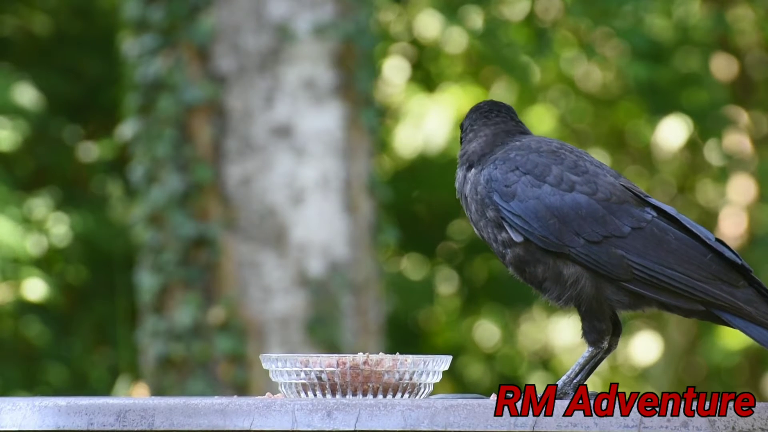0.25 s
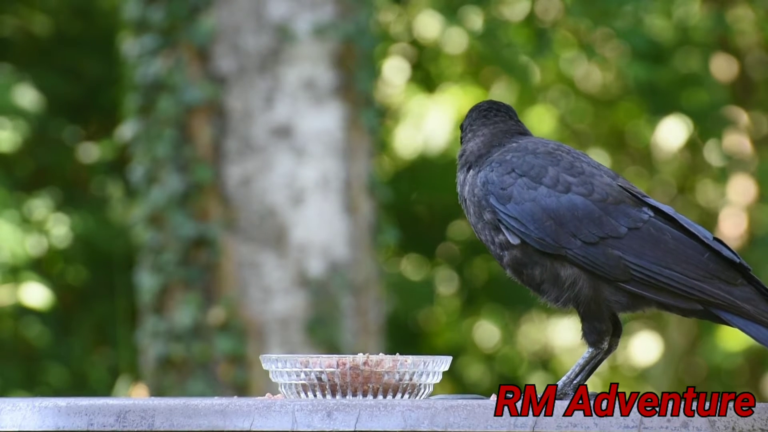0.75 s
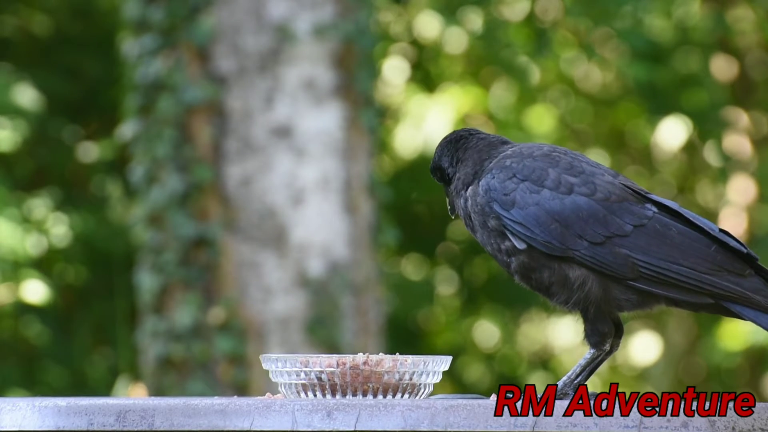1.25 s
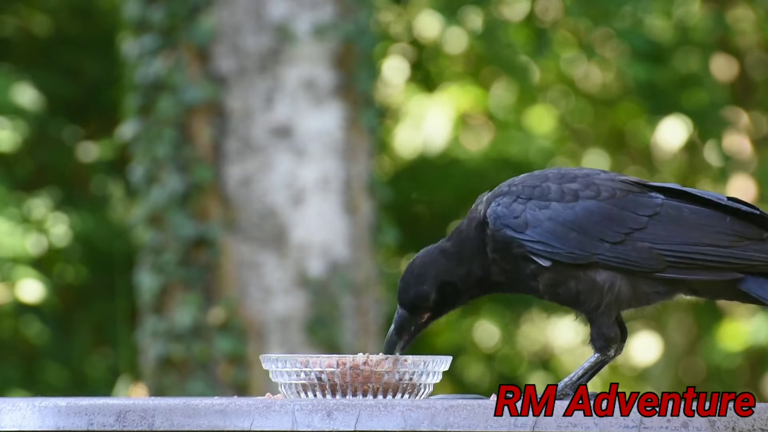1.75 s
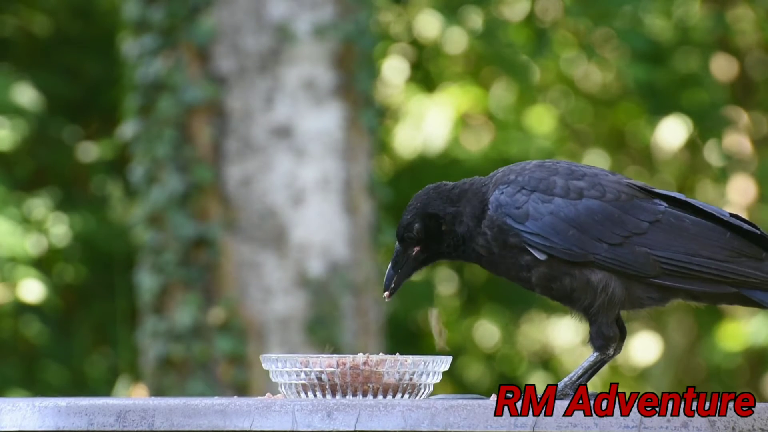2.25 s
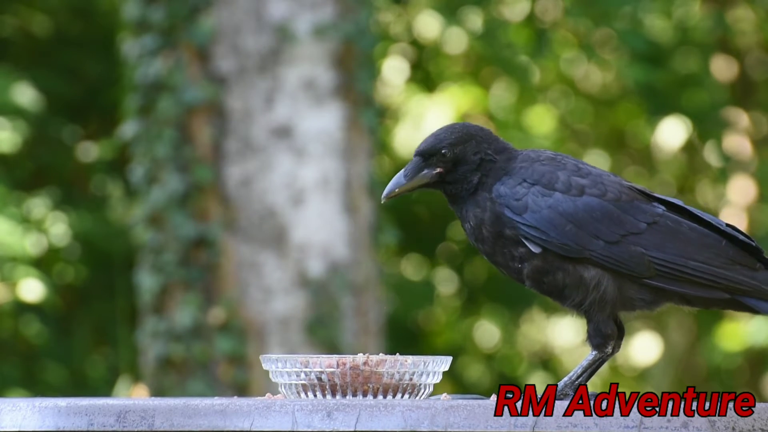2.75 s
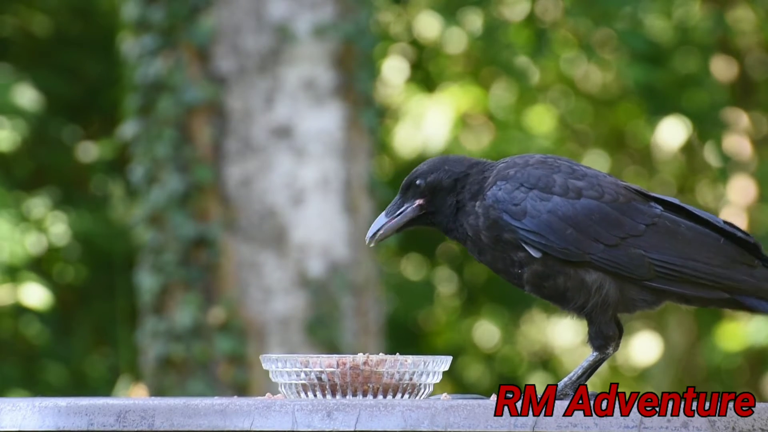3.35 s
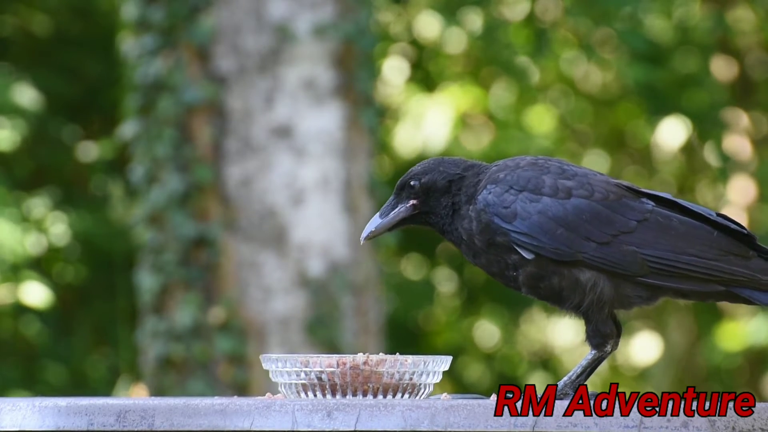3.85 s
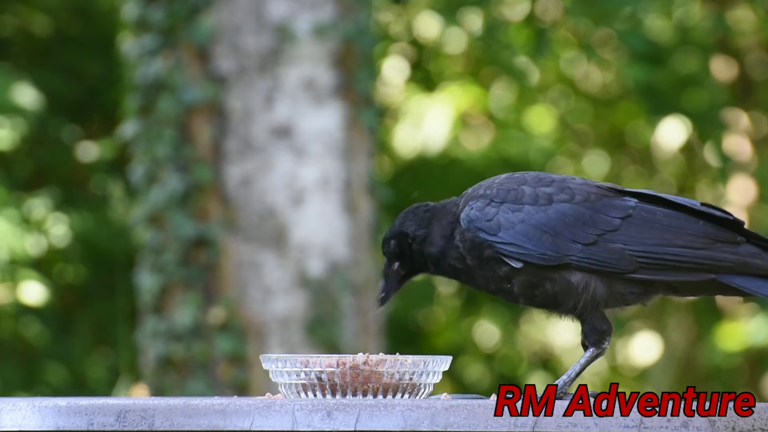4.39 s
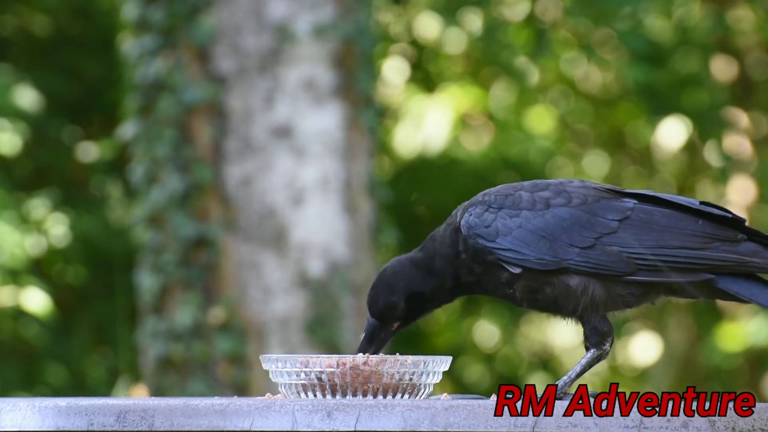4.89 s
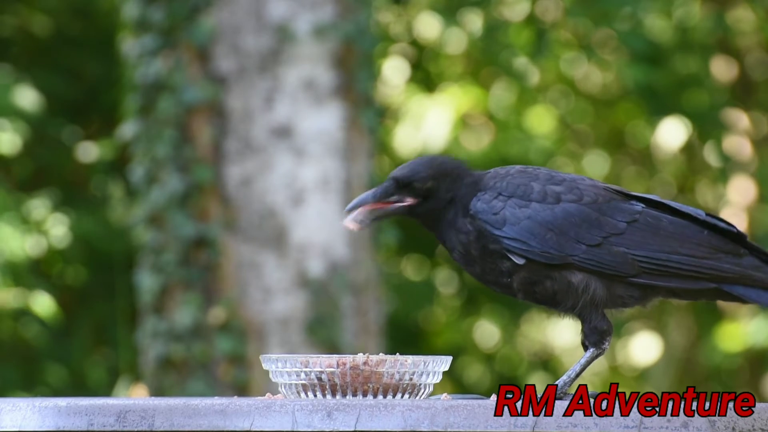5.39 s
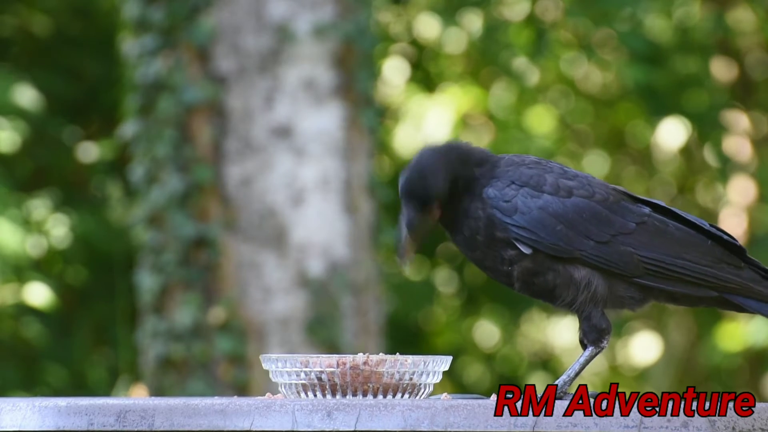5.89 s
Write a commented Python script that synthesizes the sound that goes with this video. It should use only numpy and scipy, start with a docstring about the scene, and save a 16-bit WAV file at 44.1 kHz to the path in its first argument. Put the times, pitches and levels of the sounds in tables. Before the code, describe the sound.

A quiet wooded garden in stereo: soft still air, a faint wavering low hum and a thin, flickering high insect hiss that is strongest around 1 second. At the very start a higher, nasal crow calls faintly from far off, again at about 1.2. Small birds give short, falling chips around 0.5, 0.9 to 1.1 and 1.5 to 1.9, with dry leaf flutters in the first second. A near crow, slightly right, caws at about 1.3, 2.1, 2.7, 3.7 and 4.8, each lasting roughly 0.4 to 0.5 seconds. Each caw swells in, arches slightly in pitch, buzzes and rattles with breathy harsh treble, then drops away into a short scattered echo from the trees. Sparse chips continue between caws, around 2.5, 3.2, 3.8, 4.7 and 5.4. Faint leaf flutters return near 5.2, and dim distant whistles fill the last second until about 6.

```python
"""Crow in the garden trees

A crow caws five times, harsh and rattling: a buzzing voice and puffs of air pass through its throat.
Small birds chip in short sliding whistles. Far crow calls, faint whistles and leaf flutters lie deeper.
The wood throws back a short tail made of scattered echoes.
Under it all lie still air and insects, made of shaped noise, and a faint low hum of wavering tones."""
import sys
import numpy as np
from scipy import signal
from scipy.fft import rfft, irfft, next_fast_len
from scipy.io import wavfile
from scipy.ndimage import uniform_filter1d

SR = 44100
rng = np.random.default_rng(int(sys.argv[2]) if len(sys.argv) > 2 else 0)


def wrap_up_sound(samples):
    """Save the sound to the file named by the first command line argument, as 16-bit audio."""
    columns = np.atleast_2d(samples).T
    # keep every value between -1 and 1, then stretch to whole-number steps
    tamed = np.clip(columns, -1, 1)
    steps = np.round(tamed * 32767).astype(np.int16)
    wavfile.write(sys.argv[1], SR, steps)


N = 270333  # length of the scene in samples

# Levels of single sounds are those before the final mix in scene().
# Still air, shape of its spectrum: (frequency [Hz], relative level [dB per Hz])
AIR_SPECTRUM = [(20, -5), (40, -43), (70, 3), (125, -0.5), (200, -0.5), (300, -5.5), (450, -7), (700, -5.5),
                (1100, -9), (1700, -7), (2600, -10.5), (5000, -8.5), (10000, -19.5), (15000, -18.5)]
# How alike the air is at left and right: (frequency [Hz], likeness [up to 1, below 0 counts as 0])
AIR_LIKENESS = [(60, 0.87), (150, 0.25), (380, 0.45), (940, 0.54), (2350, 0.47), (5890, -0.1),
                (14800, -0.64)]
AIR_DB = -65  # before narrow bands come and go
# Tones of the low hum: (frequency [Hz], width of the pitch waver [Hz], level before its swells [dB])
HUM_TONES = [(52.3, 2.5, -73), (102, 12.5, -78.5), (119.4, 4.8, -79), (174.3, 15.5, -75.5),
             (226, 13.1, -82.5)]
# Swell of all hum tones but the lowest: (time [s], change of level [dB])
HUM_SWELL = [(0, -4.5), (.7, 5), (1.1, 1), (6.1, -2)]
# Insects, shape of their spectrum: (frequency [Hz], relative level [dB])
INSECT_SPECTRUM = [(6500, -9), (7400, -3), (8000, 5), (8800, 4.5), (9400, 1), (10200, -6), (12000, -26.5)]
# Insects, slow loudness before a fast flicker: (time [s], level [dB])
INSECT_LEVELS = [(0, -70), (.5, -66), (1.1, -63), (1.9, -66.5), (2.6, -66), (3.5, -73), (4.5, -69),
                 (6.1, -73)]

# Tail of the wood, time to die by 60 dB: (frequency [Hz], time [s])
WOOD_T60 = [(500, .6), (1800, .55), (3200, .28), (5000, .45), (10000, .4)]
# Quick reflections off the leaves: (frequency [Hz], level [dB])
LEAF_REFLECTIONS = [(1400, -17), (2200, -12), (5000, -5), (10000, -4)]
# Quick reflections, time to die by 60 dB: (frequency [Hz], time [s])
LEAF_T60 = [(1000, 0.36), (8000, 0.091)]

# Dry flutters in the leaves: (start [s], length [s], level [dB])
FLUTTERS = [(0.075, 0.026, -65), (0.476, 0.099, -63.5), (0.778, 0.092, -60.5), (0.931, 0.078, -58.5),
            (4.699, 0.061, -68), (5.182, 0.046, -60.5), (5.306, 0.071, -65.5)]
# Leaf noise, shape of its spectrum: (frequency [Hz], relative level [dB])
LEAF_SPECTRUM = [(1000, -16), (2500, 9), (3500, 16), (6000, 8.5), (8000, 7.5), (14000, -17)]
# Faint whistles deep in the wood: (start [s], pitch [Hz], slide [share of the pitch], level [dB])
FAR_WHISTLES = [(3.27, 4500, 0.03, -109), (3.575, 4544, 0.05, -79), (4.58, 1783, 0.22, -70.5),
                (4.765, 4550, 0.01, -74), (5.14, 720, -0.29, -75), (5.445, 632, -0.27, -74),
                (5.58, 684, 0.16, -68.5), (5.69, 4560, 0.037, -77), (5.77, 1520, 0.09, -74.5),
                (5.995, 4600, 0.11, -74)]
WHISTLE_S = 0.1046
# Far crow: (start [s], length [s], start pitch [Hz], middle pitch [Hz], end pitch [Hz],
#   level before its fades [dB], roughness [about 0-1])
FAR_CAWS = [(0.022, 0.24, 875, 963.5, 847, -51.5, 0.78), (0.25, 0.37, 749, 796, 884, -62.5, 1.03),
            (1.167, 0.188, 967, 991, 934, -49, 0.31)]
# Throat of the far crow: (frequency [Hz], relative level [dB])
FAR_THROAT = [(450, -46), (720, -23), (950, -14.5), (1200, -2.5), (1600, 0.5), (1950, 3), (2400, -16),
              (3000, -27), (4100, -15), (5500, -27.5), (9000, -26)]
# Small birds: (start [s], length [s], start pitch [Hz], slide [share of the pitch], level [dB],
#   octave against the main tone [dB])
CHIPS = [(0.473, 0.039, 3380, -0.092, -50, -13), (0.506, 0.025, 3350, -0.12, -41.5, -12),
         (0.528, 0.037, 3235, -0.11, -40, -18), (0.556, 0.013, 5860, -0.12, -51, -18),
         (0.856, 0.033, 5370, -0.011, -51.5, -18), (0.968, 0.019, 3390, -0.052, -35.5, -32),
         (0.986, 0.028, 3123, -0.01, -42.5, -9.5), (1.052, 0.04, 3310, -0.1, -38, -7.5),
         (1.08, 0.053, 3245, -0.018, -45.5, 1), (1.497, 0.054, 3320, -0.07, -41, -20),
         (1.596, 0.045, 3344, -0.14, -34, 1), (1.886, 0.051, 3180, -0.12, -46, -17),
         (2.451, 0.056, 3080, -0.083, -56, -2), (2.488, 0.047, 4900, 0.053, -52.5, -20),
         (2.53, 0.021, 4590, -0.079, -54.5, -28), (2.585, 0.054, 3660, -0.1, -55.5, -39),
         (3.178, 0.037, 2440, 0.07, -58, -33), (3.26, 0.043, 3360, -0.14, -58.5, -46),
         (3.825, 0.014, 3500, -0.1, -41.5, -18), (3.832, 0.053, 2840, 0.011, -44, -6),
         (4.622, 0.076, 3560, -0.041, -57, -27), (4.692, 0.02, 3720, -0.16, -43.5, -24),
         (4.716, 0.024, 3040, -0.13, -51.5, -20), (4.743, 0.041, 3444, -0.13, -51, -9),
         (5.355, 0.026, 4394, -0.11, -48.5, -20), (5.405, 0.03, 4730, -0.02, -52.5, -32),
         (5.486, 0.023, 4340, -0.13, -44.5, -19), (5.522, 0.031, 3800, -0.17, -54, -29)]

# One row a caw: (start [s], length [s], soft lead-in [s], attack [s], release [s], effort [dB],
#   swell over the caw [dB], top pitch [Hz], crest [share of the length], flatness of the arch [exponent],
#   roughness at the crest [0-1], throat setting at the crest, only partly followed [Hz],
#   its drop at the feet [share], sharpness at full effort [factor on the throat's dB],
#   rasp against the body [dB], top edge against the body [dB])
CAWS = [ (1.309, 0.46, 0.095, 0.1, 0.12, -29, -3.7, 373.7, 0.58, 1.53, 0.33, 1850, 0.15, 1.66, -11.5, -26),
        (2.056, 0.36, 0.031, 0.08, 0.096, -30, 2, 370.5, 0.45, 1.99, 0.36, 1880, 0.18, 1.43, -8.5, -27),
        (2.715, 0.41, 0.03, 0.075, 0.06, -30.5, 3.5, 370.6, 0.43, 2.18, 0.42, 1944, 0.085, 1.35, -5.5, -19),
        (3.735, 0.49, 0.043, 0.12, 0.083, -29.5, -3, 369, 0.61, 2.5, 0.23, 1884, 0.18, 1.38, -10, -31.5),
        (4.839, 0.36, 0.046, 0.16, 0.089, -29.5, -1.5, 370.6, 0.62, 1.3, 0.46, 1918, 0.25, 1.7, -9.5, -35),
        ]
# Throat at rest, main resonance and upper ones: (frequency [Hz], relative level at sharpness 1 [dB])
THROAT_SPECTRUM = [(300, -64), (700, -47.5), (920, -13), (1090, -38.5), (1280, -9), (1450, -11.5),
                   (1600, -2.5), (1800, 0.5), (2000, -1.5), (2220, -6), (2450, -13), (2750, -25),
                   (3400, -36.5), (5000, -70)]
# Rasp, the harsh treble: (frequency [Hz], relative level [dB])
RASP_SPECTRUM = [(2200, -81), (3100, -20), (3800, -13.5), (4400, -3), (4900, 2.5), (5600, -1), (6300, -7),
                 (7000, 1), (7650, -8), (8500, -0.5), (9100, -8), (9550, -30), (11000, -40.5)]
# Top edge, the highest treble: (frequency [Hz], relative level [dB])
EDGE_SPECTRUM = [(9000, -9), (9600, -7), (9900, 18.5), (10500, 17.5), (10900, 5), (11400, -38),
                 (15000, -125)]
THROAT_HZ = 1922.5  # throat setting that leaves the spectrum at rest
THROAT_FOLLOW = 0.59  # exponent: how far the throat follows its setting
NARROWING = 0.015  # extra sharpness for each dB below the loudest effort
# pitch, throat, loudness, treble and roughness all ride one arch; these act at its feet
PITCH_DROP, EFFORT_SAG_DB, RASP_SAG_DB = 0.14, -8.5, -2.5
ROUGH_START, ROUGH_END = .85, .45  # roughness 0-1 at the two feet
DROOP, DROOP_S = 0.1, 0.086  # as the air runs out, pitch and throat sink by this further share
# swell in and fade out: depth in dB and exponent of the curve
ATTACK_DB, ATTACK_CURVE = -19.5, 2
RELEASE_DB, RELEASE_CURVE = -27.5, 1.92
LEAD_IN_DB = -6  # the voice is this much softer until it breaks in
RASP_BITE = 0.073  # extra dB of treble for each dB of the swell and the fade
RASP_FADE_DB_PER_S = -3  # the treble tires sooner than the body
PULSES_PER_RATTLE = 5  # voice cycles in one rattle
RATTLE_DB, RASP_RATTLE_DB, SHIMMER_DB = 1.9, .5, 1.3  # rattle, extra in the treble, random shimmer
JITTER, LIMP = .045, .012  # timing errors in cycles: random (at roughness 1) and with the rattle
BREATH, RASP_NOISE = .55, .65  # puffs of air in the body (at roughness 1) and in the treble
# second side of the voice organ (pitch ratio, level), halfway lines, uneven swell of each harmonic
SECOND_RATIO, SECOND_DB, HALF_DB, STRAND_DB = 1.265, -10, -10, 4.5

CUT_HZ = 15000


def gain_of(db):
    """Turns decibels into a factor."""
    return 10 ** (np.asarray(db) / 20)


def evened(x):
    """Scales a sound to an average strength (rms) of 1."""
    return x / np.sqrt(np.mean(x ** 2) + 1e-20)


def read(points, hz):
    """Reads a frequency table between its points, on a log-frequency axis."""
    f, value = np.transpose(points)
    return np.interp(np.log(hz + 1), np.log(f + 1), value)


def over_time(points):
    """Draws a time table as a line over the whole scene."""
    return np.interp(np.arange(N) / SR, *np.transpose(points))


def sine(hz):
    """A pure tone that follows a changing pitch."""
    return np.sin(2 * np.pi * np.cumsum(hz) / SR)


def coloured(x, spectrum):
    """Gives a sound a fixed balance of low and high, at rms 1."""
    size = x.shape[-1]
    length = next_fast_len(size, True)
    gain = gain_of(read(spectrum, np.fft.rfftfreq(length, 1 / SR)))
    return evened(irfft(rfft(x, length) * gain, length)[..., :size])


def wander(size, hz):
    """Smooth random drift, mostly slower than hz, drawn at rms 1."""
    length = max(next_fast_len(size), SR)
    f = np.fft.rfftfreq(length, 1 / SR)
    smooth = rfft(rng.standard_normal(length)) * np.exp(-(f / hz) ** 2)
    return evened(irfft(smooth, length))[:size]


def add(mix, s, sound):
    """Lays a sound into the mix at s seconds."""
    part = mix[max(round(s * SR), 0):][:len(sound)]
    part += sound[:len(part)]


def played(source, table):
    """Sounds every row of a table with its source."""
    mix = np.zeros(N)
    for row in table:
        add(mix, *source(*row))
    return mix


def patchy(x, depth_db):
    """Lets narrow bands come and go, as the far sounds of a wood do."""
    z = signal.stft(x, SR, nperseg=1024, noverlap=768)[2]
    patches = rng.standard_normal(z.shape[1:])
    patches = uniform_filter1d(patches, size=5, axis=0)  # neighbouring frequencies move together
    patches = evened(uniform_filter1d(patches, size=18, axis=1))  # and change slowly
    return signal.istft(z * gain_of(depth_db * patches), SR, nperseg=1024, noverlap=768)[1][:, :N]


def still_air():
    """Soft noise, partly shared by both ears, whose level and narrow bands drift."""
    same = np.clip(read(AIR_LIKENESS, np.fft.rfftfreq(N, 1 / SR)), 0, 1)
    left, other = rfft(rng.standard_normal((2, N)))
    right = same * left + np.sqrt(1 - same ** 2) * other
    air = coloured(irfft(np.array([left, right]), N), AIR_SPECTRUM)
    return patchy(gain_of(AIR_DB + .5 * wander(N, 0.33)) * air, depth_db=3.8)


def low_hum():
    """A few low tones, each wavering at random in pitch and loudness."""
    tones = []
    for hz, width_hz, db in HUM_TONES:
        tone = evened(sine(hz + width_hz / 2 * wander(N, 11.36)))
        tones.append(gain_of(db + 2.6 * wander(N, 14)) * tone)
    return tones[0] + gain_of(over_time(HUM_SWELL)) * sum(tones[1:])


def insects():
    """A thin band of high noise that flickers and slowly swells."""
    chorus = coloured(rng.standard_normal((2, N)), INSECT_SPECTRUM)
    return gain_of(over_time(INSECT_LEVELS) + wander(N, 12)) * chorus


def scatter(x, t60, delay):
    """Sparse echoes from trunks and leaves, different at each ear, each band dying at its own speed."""
    taps = np.zeros((2, SR))
    # one echo at a random place in every 20 samples
    at = np.arange(0, SR - 20, 20) + rng.integers(0, 20, (2, (SR - 1) // 20))
    np.put_along_axis(taps, at, rng.choice([-1., 1.], at.shape), 1)
    hz, t, z = signal.stft(taps, SR, nperseg=256)
    decay = gain_of(-60 * t / read(t60, hz)[:, None])
    tail = signal.istft(z * decay, SR, nperseg=256)[1]
    tail = np.pad(tail / np.linalg.norm(tail[0]), ((0, 0), (int(abs(delay) * SR), 0)))
    return signal.fftconvolve(x[None], tail, axes=1)[:, :N]


def placed(x, pan_db, wood_db):
    """Direct sound, quick reflections from the leaves and the tail of the wood; pan above 0 is left."""
    leaf_gain = gain_of(read(LEAF_REFLECTIONS, np.fft.rfftfreq(N, 1 / SR)))
    near = irfft(rfft(scatter(x, LEAF_T60, delay=.001)) * leaf_gain, N)
    sides = gain_of([[pan_db / 2], [-pan_db / 2]])
    return (x + near) * sides + gain_of(wood_db) * scatter(x, WOOD_T60, delay=.015)


def flutter(s, length, db):
    """A soft, uneven burst of leaf noise."""
    size = max(int(length * SR), 64)
    grain = rng.standard_normal(SR)[:size] * gain_of(2.4 * wander(size, 220))
    return s, gain_of(db) * evened(coloured(grain, LEAF_SPECTRUM) * np.hanning(size))


def far_whistle(s, pitch_hz, slide, db):
    """A soft, nearly pure note on a slide of pitch."""
    size = int(WHISTLE_S * SR)
    hz = pitch_hz * (1 + slide * np.linspace(-.5, .5, size)) + 30 * wander(size, 100)
    return s, gain_of(db) * evened(sine(hz) * np.hanning(size))


def far_caw(s, length, start_hz, middle_hz, end_hz, db, rough):
    """A higher, nasal call: seven harmonics on a bent pitch, with noise, through a fixed throat."""
    size = int(length * SR)
    hz = np.interp(np.linspace(0, 2, size), np.arange(3), [start_hz, middle_hz, end_hz])
    phase = 2 * np.pi * np.cumsum(hz * (1 + .13 * rough * wander(size, 400))) / SR
    tone = evened(sum(np.cos(k * phase) for k in range(1, 8)))
    voice = tone + rough * rng.standard_normal(SR)[:size]
    return s, gain_of(db) * coloured(voice, FAR_THROAT) * signal.windows.tukey(size, .5)


def chip(s, length, start_hz, slide, db, octave_db):
    """A short sliding whistle with its octave and a quick waver."""
    size = max(int(length * SR), 64)
    hz = start_hz * np.linspace(1, 1 + slide, size) * (1 + .025 * wander(size, 450))
    whistle = sine(hz) + gain_of(octave_db) * sine(2 * hz)
    shape = signal.windows.tukey(size, .6) * gain_of(2.5 * wander(size, 250))
    return s, gain_of(db) * evened(shape * whistle)


def arch(share, crest, flatness):
    """Rises from 0 to 1 at the crest and falls back to 0."""
    away = np.maximum((crest - share) / crest, (share - crest) / (1 - crest))
    return 1 - np.clip(away, 0, 1) ** flatness


def envelope_db(t, lead_in, attack, release):
    """Swells in, breaks into full voice, holds and fades out."""
    rise = ATTACK_DB * np.maximum(1 - t / attack, 0) ** ATTACK_CURVE
    fall = RELEASE_DB * np.maximum(1 - (t[-1] - t) / release, 0) ** RELEASE_CURVE
    return rise + fall + LEAD_IN_DB * uniform_filter1d(1. * (t < lead_in), size=130)


def steadied(x):
    """Holds the level near 1 over some 30 ms, keeping the faster rattle."""
    power = uniform_filter1d(uniform_filter1d(x ** 2, size=1200), size=600)
    return x / np.sqrt(power + 1e-12)


def stack(turns, count):
    """Harmonics of one vibrating membrane; each strand swells and fades on its own."""
    knots = np.arange(0, SR, 1300)  # samples between random levels
    now = np.arange(len(turns))
    chance = np.clip(rng.standard_normal((count, len(knots))), -1.5, 1.5)
    total = np.zeros(len(turns))
    for k, level in enumerate(gain_of(STRAND_DB * chance), 1):
        total += np.interp(now, knots, level) * np.cos(2 * np.pi * (k * turns + rng.random()))
    return evened(total)


def syrinx(glide, turns, rough):
    """The crow's voice organ (syrinx): its two sides buzz at different pitches."""
    # strong and weak cycles alternate, which puts lines halfway between the harmonics
    halves = np.sqrt(2) * np.cos(np.pi * turns) * stack(turns, count=32)
    # the other side runs a little higher
    second = stack(SECOND_RATIO * glide + JITTER * rough * wander(len(turns), 136), count=25)
    return evened(stack(turns, count=33) + gain_of(HALF_DB) * halves + gain_of(SECOND_DB) * second)


def throat(x, stretch, sharpness):
    """The throat's resonances, moved up and down and widened as the beak opens."""
    hz, t, z = signal.stft(x, SR, nperseg=512, noverlap=384)
    stretch, sharpness = (np.interp(t * SR, np.arange(len(x)), c) for c in (stretch, sharpness))
    gain = gain_of(sharpness * read(THROAT_SPECTRUM, hz[:, None] / stretch))
    return signal.istft(z * gain, SR, nperseg=512, noverlap=384)[1][:len(x)]


def caw(s, length, lead_in, attack, release, db, swell_db, top_hz, crest, flatness, crest_rough,
        open_hz, throat_drop, open_sharpness, rasp_db, edge_db):
    """The syrinx and puffs of air, shaken by a rattle, pass through the throat; harsh treble is added."""
    t = np.arange(0, length, 1 / SR)
    size, share = len(t), t / length

    # slack is 0 at the crest of the arch and 1 at its feet
    slack = 1 - arch(share, crest, flatness)
    droop = DROOP * np.maximum(1 - (length - t) / DROOP_S, 0)
    pitch_hz = top_hz * (1 - PITCH_DROP * slack - droop)
    throat_hz = open_hz * (1 - throat_drop * slack - droop)
    shape_db = envelope_db(t, lead_in, attack, release)
    effort_db = db + shape_db + EFFORT_SAG_DB * slack + swell_db * (share - .5)
    treble_db = RASP_BITE * shape_db + RASP_SAG_DB * slack + RASP_FADE_DB_PER_S * (t - length / 2)
    foot_rough = np.where(share < crest, ROUGH_START, ROUGH_END)
    rough = crest_rough + (foot_rough - crest_rough) * slack

    # glide and turns count voice cycles
    glide = np.cumsum(pitch_hz * (1 + .012 * rough * wander(size, 20))) / SR
    rattle_turns = glide / PULSES_PER_RATTLE + 0.32 * rough * wander(size, 135) + rng.random()
    rattle = 2 * np.pi * rattle_turns
    # each rattle tugs the cycles early and late
    turns = glide + LIMP * np.sin(rattle) + JITTER * rough * wander(size, 216)
    voice = syrinx(glide, turns, rough)
    # air noise is strongest at the start of each cycle
    puffs = evened((.5 + np.exp(-(turns % 1) / 0.44)) * rng.standard_normal(SR)[:size])
    shake = gain_of(RATTLE_DB * np.cos(rattle) + SHIMMER_DB * wander(size, 170))

    # at the soft start and end the beak is half shut and the resonance narrower
    sharpness = open_sharpness + NARROWING * np.minimum(effort_db.max() - effort_db, 20)
    stretch = (throat_hz / THROAT_HZ) ** THROAT_FOLLOW
    body = steadied(throat(shake * (voice + BREATH * rough * puffs), stretch, sharpness))
    # the treble is noisier and rattles more deeply
    harsh = shake * gain_of(RASP_RATTLE_DB * np.cos(rattle)) * (voice + RASP_NOISE * puffs)
    rasp = gain_of(rasp_db) * steadied(coloured(harsh, RASP_SPECTRUM))
    edge = gain_of(edge_db) * steadied(coloured(harsh, EDGE_SPECTRUM))
    whole = body + gain_of(treble_db) * (rasp + edge)
    return s, gain_of(effort_db) * whole * signal.windows.tukey(size, .08)


def scene():
    """The crow a little to the right, small birds and the far callers deeper in the trees."""
    background = still_air() + low_hum() + insects()
    far_sounds = played(far_caw, FAR_CAWS) + played(far_whistle, FAR_WHISTLES) + played(flutter, FLUTTERS)
    far = placed(far_sounds, pan_db=1, wood_db=-1.5)
    small = placed(played(chip, CHIPS), pan_db=1.5, wood_db=-5)
    crow = placed(played(caw, CAWS), pan_db=-2.7, wood_db=-19.5)
    return background + gain_of(-1.5) * far + gain_of(-8.64) * small + gain_of(-1.5) * crow


def record(dry):
    """Cuts the highest treble, above CUT_HZ, with a steep low-pass filter."""
    low_pass = signal.firwin(511, CUT_HZ, window=("kaiser", 9), fs=SR)
    return signal.oaconvolve(dry, low_pass[None], "same")


dry = scene()
out = record(dry)
wrap_up_sound(out)
```